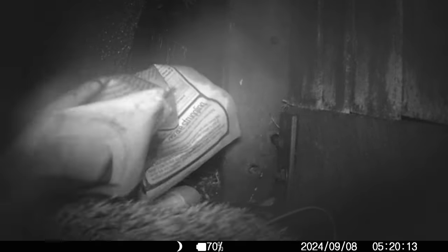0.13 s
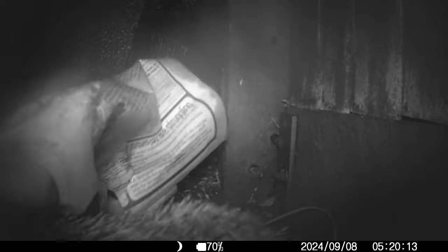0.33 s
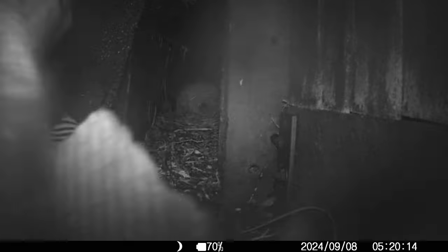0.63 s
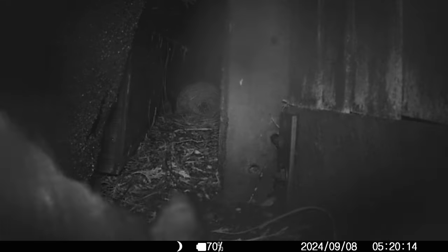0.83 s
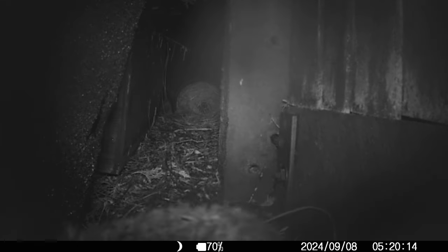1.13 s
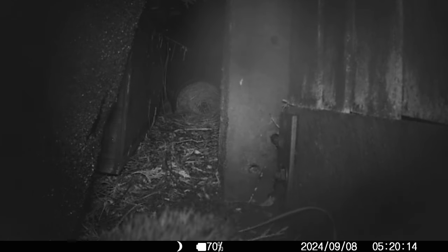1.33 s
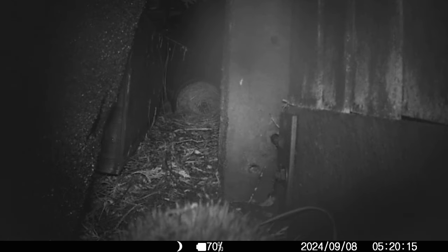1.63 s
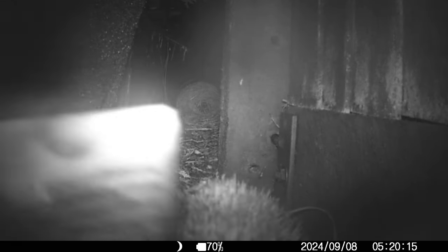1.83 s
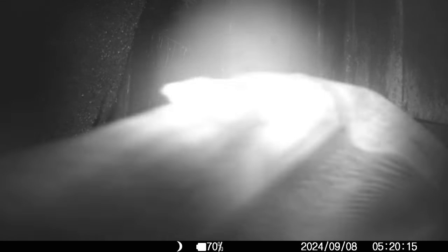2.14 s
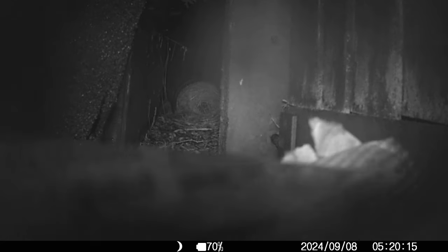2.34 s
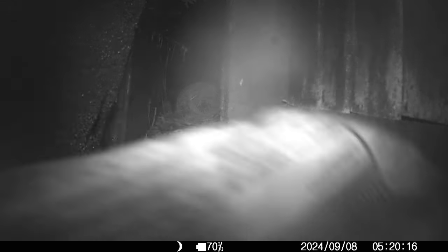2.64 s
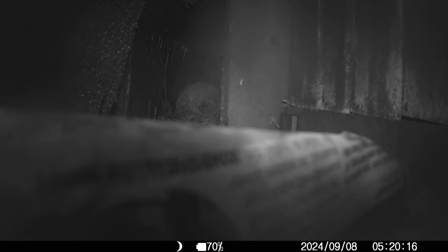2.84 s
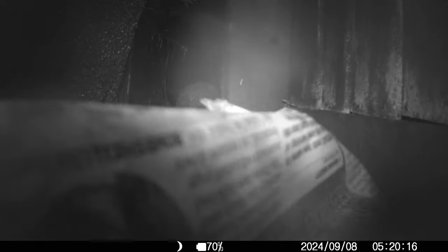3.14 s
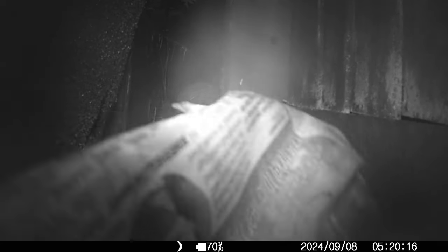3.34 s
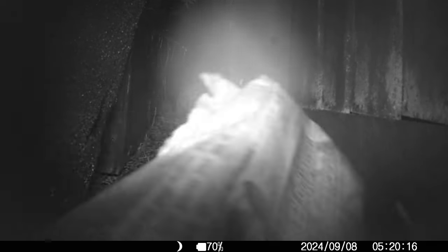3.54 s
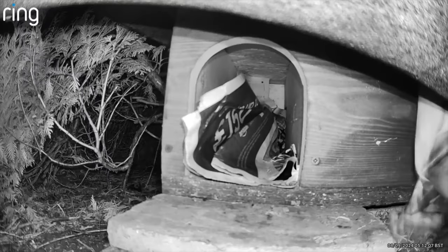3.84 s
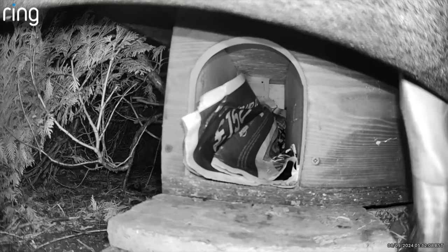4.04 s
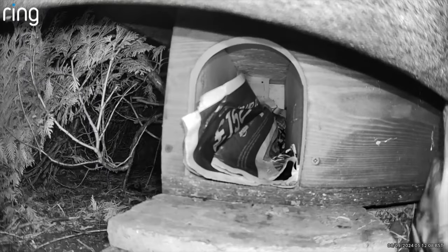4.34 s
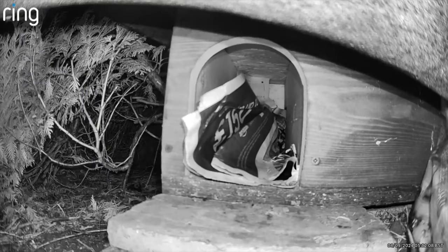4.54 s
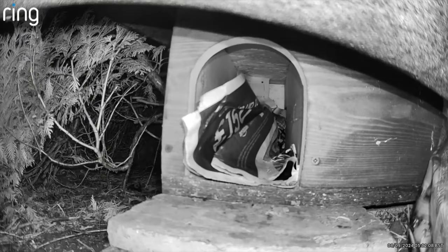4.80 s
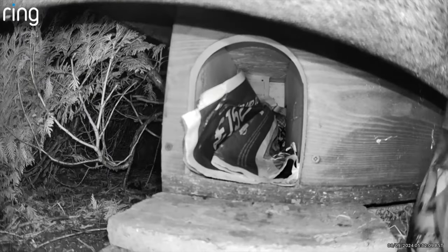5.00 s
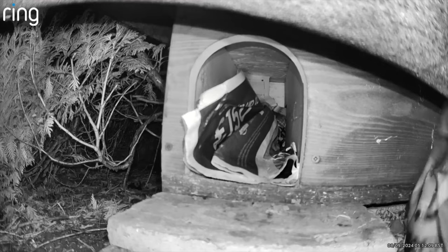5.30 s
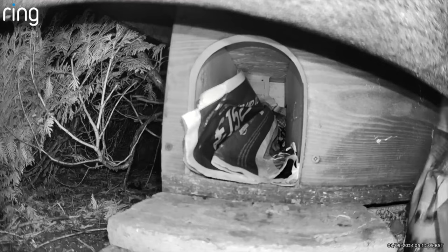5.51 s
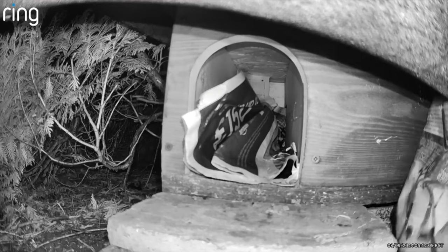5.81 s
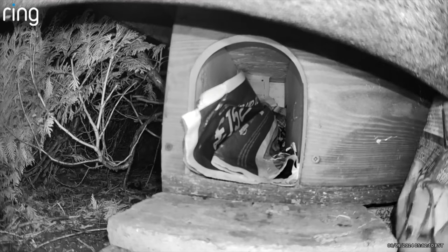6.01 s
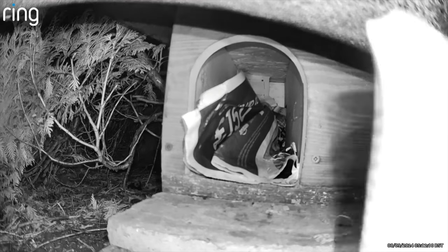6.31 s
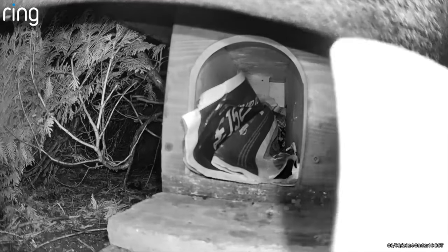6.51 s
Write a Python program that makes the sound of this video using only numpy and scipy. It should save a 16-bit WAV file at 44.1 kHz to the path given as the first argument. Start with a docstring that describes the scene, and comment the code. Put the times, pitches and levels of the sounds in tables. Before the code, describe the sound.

Dull papery crackling with soft thuds and plasticky scrapes up close, a brief cut, then crisp, swishing tugs of paper over wood.

```python
"""In a wooden shelter at night, a hedgehog drags a sheet of newspaper around.
First it is heard inside: shaped friction noise makes the paper, and damped modes ring the plastic
case of the microphone as spines scrape it and the body bumps it. After a very short gap it is heard
outside the entrance, brighter and smoother: denser slips, swelling in tugs, over a faint hiss.
Creases snap as band-limited clicks in both places."""
import sys
import numpy as np
from scipy import signal
from scipy.fft import rfft, irfft, next_fast_len
from scipy.io import wavfile
from scipy.ndimage import map_coordinates

SR = 44100
rng = np.random.default_rng(int(sys.argv[2]) if len(sys.argv) > 2 else 0)


def transcribe(signal):
    """Save signal, clipped to [-1, 1], as a 16-bit WAV file at the path in sys.argv[1]."""
    frames = np.atleast_2d(signal).T
    limited = np.clip(frames, -1, 1)
    pcm = np.round(limited * 32767).astype(np.int16)
    wavfile.write(sys.argv[1], SR, pcm)


N = 293696
TIME = np.arange(N) / SR  # s

MOVE_S = 3.618  # the listening point moves from inside to outside
INSIDE_TOP_HZ, TOP_HZ = 5000, 8900  # band limits of the inside and of the whole
STROKE_DROP_DB = 10  # fall of a stroke's level one rise before its peak and one fall after

# modes of the plastic case: (frequency [Hz], relative level [dB], t60 [s])
CASE_MODES = [(214, -11, 0.046), (271.3, -4, 0.086), (450, -13.5, 0.044), (629, -5.5, 0.041),
              (1060, -9.5, 0.049), (1321, 5, 0.029), (2175, 0, 0.014), (2450, -0.5, 0.028),
              (3000, -25, 0.057), (3400, -19, .03)]


def amp(db):
    """The level law: decibels to an amplitude ratio."""
    return 10 ** (np.asarray(db) / 20)


def unit(x):
    """Power normalisation: x scaled to rms 1."""
    return x / np.sqrt(np.mean(x ** 2) + 1e-20)


def along(points, hz):
    """Logarithmic pitch scale: (frequency [Hz], value) points interpolated over log frequency."""
    f, v = np.transpose(points)
    return np.interp(np.log(hz + 1), np.log(f + 1), v)


def filtered(x, response):
    """Linear filtering: the spectrum of x times a response of frequency."""
    size = next_fast_len(N + 8192)
    hz = np.fft.rfftfreq(size, 1 / SR)
    return irfft(rfft(x, size) * response(hz), size)[:N]


def coloured(x, spectrum):
    """Spectral shaping: x through a (frequency [Hz], gain [dB]) curve, at rms 1."""
    return unit(filtered(x, lambda hz: amp(along(spectrum, hz))))


def add(track, s, sound):
    """Superposition: a short sound is mixed in at time s."""
    part = track[round(s * SR):][:len(sound)]
    part += sound[:len(part)]


def paper_inside():
    """Stick-slip and bending: creases crinkle in shifting colours while the sheet flexes more dully."""
    # shoves: (fastest at [s], rise [s], fall [s], relative crinkle level [dB], relative flexing level [dB])
    shoves = [(.03, 0.12, .07, -46, -53), (.11, 0.043, 0.019, -51.5, -54), (.27, 0.048, 0.063, -64, -51.5),
              (.35, 0.074, 0.11, -49, -59), (.475, 0.086, .035, -46.5, -57), (.66, 0.12, 0.064, -45, -42.5),
              (.77, 0.097, 0.16, -41, -45.5), (.95, 0.036, 0.074, -43.5, -48),
              (1.19, 0.068, 0.073, -39, -48), (1.47, 0.063, 0.12, -40.5, -55),
              (1.595, 0.022, 0.011, -42.5, -44), (1.66, .04, 0.065, -52, -56),
              (1.82, 0.079, 0.094, -50, -67), (2.06, 0.088, 0.074, -36, -41.5),
              (2.16, 0.11, 0.042, -36, -36), (2.46, 0.052, 0.074, -44, -48),
              (2.61, 0.017, 0.071, -44.5, -50.5), (2.68, 0.07, 0.052, -40.5, -45.5),
              (2.81, 0.071, 0.054, -43, -45), (3.0, 0.065, 0.054, -49.5, -49), (3.14, 0.092, .1, -57, -56),
              (3.29, 0.076, 0.13, -38, -42), (3.38, 0.041, 0.042, -36, -35),
              (3.5, 0.081, 0.095, -39, -42.5)]
    # colour of the crinkling: (frequency [Hz], relative gain [dB])
    crinkle_colour = [(200, -38), (700, -8), (1500, 3), (2000, 1.5), (2750, 4), (3400, 2.5), (4250, 6.5),
                      (4700, 2), (4950, -4), (5300, -23.5)]
    # colour of the flexing sheet: (frequency [Hz], relative gain [dB])
    flex_colour = [(100, -31.5), (250, -1), (420, -0.5), (700, -2), (1300, -7), (2200, -10.5), (4000, -39)]

    crinkle, flex = strokes(shoves, roundness=1.42) + amp([[-71], [-72]])  # the sheet is never quite still
    fine = friction(rate=700, spread_db=5.5, smooth_db=-1, clump_db=1.5, clump_rate=110)
    fine = shifting(fine, depth_db=2.2, width_hz=900, rate=150, size=128)
    fine = shifting(fine, depth_db=1.5, width_hz=277.6, rate=18, size=512)
    coarse = friction(rate=500, spread_db=4, smooth_db=-2, clump_db=3, clump_rate=80)
    coarse = shifting(coarse, depth_db=2.6, width_hz=170, rate=30, size=512)
    ticks = amp(-6.5) * crackle(rate=60, centre_hz=2800)

    crinkling = crinkle * (coloured(fine, crinkle_colour) + ticks)
    flexing = amp(1.5) * flex * coloured(coarse, flex_colour)
    return crinkling + flexing


def paper_outside():
    """Sliding friction: each tug draws the sheet over wood in dense slips, above the rustle of its folds."""
    # tugs: (fastest at [s], rise [s], fall [s], relative sliding level [dB], relative flexing level [dB])
    tugs = [(3.66, 0.07, 0.033, -52.5, -62.5), (3.83, 0.071, 0.086, -28, -38),
            (3.98, 0.064, 0.13, -26, -36), (4.13, 0.073, 0.049, -23, -31.5),
            (4.215, 0.037, 0.059, -20.5, -31), (4.4, 0.089, 0.064, -28.5, -35),
            (4.575, 0.17, .046, -25.5, -34), (4.695, .04, 0.031, -48, -60), (4.78, 0.04, 0.044, -53, -59.5),
            (4.96, 0.026, .04, -35.5, -44.5), (5.04, .052, 0.089, -23, -30), (5.23, 0.059, .1, -40, -43),
            (5.36, 0.05, .08, -29, -33.5), (5.46, .07, 0.043, -25.5, -29.5), (5.66, 0.11, .06, -35, -46.5),
            (5.765, 0.1, 0.089, -22.5, -27.5), (5.88, 0.032, .028, -30.5, -34.5),
            (5.96, 0.052, 0.066, -55.5, -64), (6.265, 0.034, 0.14, -23.5, -31.5),
            (6.38, 0.067, 0.099, -27, -34), (6.63, 0.19, 0.2, -29.5, -35.5)]
    # colour of the sliding: (frequency [Hz], relative gain [dB])
    slide_colour = [(500, -41.5), (1300, -14.5), (1680, -0.5), (2050, -1.5), (2600, -0.5), (3130, 2.5),
                    (3650, -0.5), (4300, 1.5), (5250, -1), (6000, -4.5), (6850, -10), (7400, -18),
                    (8000, -26), (8750, -41)]
    # colour of the hollow, flexing sheet: (frequency [Hz], relative gain [dB])
    sheet_colour = [(25, -22.5), (70, -13.5), (140, -3.5), (250, 0.5), (560, 0.5), (850, -3), (1200, -11.5),
                    (2000, -10.5), (5000, -51)]
    # the sheet's edge catching more or less: (time [s], lift of the fizz [dB])
    edge_lift = [(3.63, -3), (3.95, -1.5), (4.2, 3), (4.5, -0.9), (5.05, -2), (5.2, -1), (5.42, 0),
                 (5.75, 0.5), (6.3, -0.2), (6.66, -4)]

    slide, flex = strokes(tugs, roundness=1.61) + amp([[-76], [-88]])
    fine = friction(rate=2600, spread_db=4, smooth_db=0, clump_db=1.2, clump_rate=140)
    fine = shifting(fine, depth_db=1.78, width_hz=350, rate=30, size=512)
    fine = coloured(fine, slide_colour)
    fizz = filtered(fine, lambda hz: 1 - 1 / (1 + (hz / 5200) ** 8))  # what lies above about 5200 Hz
    edge_s, edge_db = np.transpose(edge_lift)
    edge = amp(np.interp(TIME, edge_s, edge_db))
    coarse = friction(rate=900, spread_db=8.5, smooth_db=5, clump_db=2.5, clump_rate=76)
    ticks = amp(-14) * coloured(crackle(rate=83, centre_hz=3600), slide_colour)

    sliding = amp(-1) * slide * (fine + (edge - 1) * fizz + ticks)
    flexing = amp(0.5) * flex * coloured(coarse, sheet_colour)
    return sliding + flexing


def friction(rate, spread_db, smooth_db, clump_db, clump_rate):
    """Stick-slip: tiny slips of uneven size, rate per second, over a smooth rub, in quick clumps."""
    count = 60000
    sign = rng.choice([-1, 1], count)
    size = sign * amp(spread_db * np.clip(rng.standard_normal(count), -3, 2))
    where = rng.integers(0, N, count)
    used = np.arange(count) < rate * N / SR
    slips = unit(np.bincount(where, size * used, N))
    rub = amp(smooth_db) * rng.standard_normal(N)
    clumps = map_coordinates(rng.standard_normal(4096), [TIME * clump_rate], mode="mirror")
    return unit((slips + rub) * amp(clump_db * np.clip(clumps, -2, 2)))


def shifting(x, depth_db, width_hz, rate, size=256):
    """Time-varying resonance: paper keeps changing shape, so broad bands of its sound rise and sink."""
    hz, t, z = signal.stft(x, SR, nperseg=size)
    place = np.meshgrid(hz / width_hz, t * rate, indexing="ij")
    field = map_coordinates(rng.standard_normal((128, 2048)), place, order=1, mode="mirror")
    shifted = signal.istft(z * amp(depth_db * unit(field)), SR, nperseg=size)[1]
    return unit(shifted[:N])


def crackle(rate, centre_hz, spread_db=4.0, spread_octaves=0.87, cycles=1.2):
    """Random buckling: lesser creases give way, each a damped tick at its own pitch; rms 1."""
    count, order = 1500, 128  # ticks available, samples in each
    sign, size, pitch = rng.standard_normal((count, 3)).T
    start = rng.integers(0, N - order, count)
    hz = centre_hz * 2 ** (spread_octaves * pitch[:, None])
    turns = hz * np.arange(order) / SR
    used = np.arange(count) < rate * N / SR
    level = np.sign(sign) * amp(spread_db * np.clip(size, -2, 1.5)) * used
    ticks = level[:, None] * np.sin(2 * np.pi * turns) * np.exp(-turns / cycles)
    where = start[:, None] + np.arange(order)
    return unit(np.bincount(where.ravel(), ticks.ravel(), N))


def stroke(s, rise, fall, roundness):
    """Speed sets level: a movement quickens until s, then slows (roundness 1 = a point, 2 = a bell)."""
    away = np.maximum((s - TIME) / rise, (TIME - s) / fall)
    return amp(-STROKE_DROP_DB * np.minimum(away, 12) ** roundness)


def strokes(rows, roundness):
    """Incoherent addition: gains of the two layers each movement drives, overlaps summed in power."""
    power = 0
    for s, rise, fall, *levels_db in rows:
        power = power + np.outer(amp(levels_db), stroke(s, rise, fall, roundness)) ** 2
    return np.sqrt(power)


def snaps(flutter_db=-17, band_ratio=1.93):
    """Buckling instability: a crease snaps with one sharp click and the sheet flutters briefly after it."""
    # creases snapping: (time [s], peak of the click [dB], band centre [Hz])
    creases = [(0.103, -26, 3600), (.547, -26.5, 3500), (.6305, -24, 1400), (0.637, -21.5, 3900),
               (.669, -21, 4000), (.784, -18.5, 2200), (0.81, -18.5, 2200), (.9325, -22.5, 3800),
               (0.961, -20, 3600), (1.1521, -16, 3400), (1.161, -17, 3400), (1.6018, -23.5, 3500),
               (1.7447, -28, 3000), (2.0167, -12, 3830), (2.0774, -18, 3600), (2.1233, -18, 1980),
               (2.2629, -31, 1130), (2.289, -28, 2040), (2.872, -11, 1500), (2.911, -27, 1020),
               (3.465, -23.5, 990), (3.5052, -18.5, 3800), (3.522, -16.5, 2400), (3.5668, -16, 2670),
               (4.1557, -13, 3800), (4.2574, -7, 4200), (4.7688, -25, 4150), (4.9818, -13.5, 2960),
               (5.1542, -17.5, 3000), (5.4129, -4.5, 3600), (5.5474, -12, 4350), (6.098, -44.5, 2500)]
    out, t = np.zeros(N), np.arange(SR // 12) / SR
    for s, db, hz in creases:
        # a harder snap frees the crease more cleanly: the flutter's t60, 0.02 s at -22 dB, halves every 18.5 dB
        t60 = 0.02 * 2 ** ((-22 - db) / 18.5)
        top_hz = 4700 if s < MOVE_S else 6700
        band = np.vstack([
            signal.butter(2, [hz / band_ratio, hz * band_ratio], "bandpass", fs=SR, output="sos"),
            signal.butter(8, top_hz, fs=SR, output="sos")])
        click = signal.sosfilt(band, t == 0)
        decay = amp(flutter_db - 60 * t / t60) * (t > 1 / hz)  # starts one cycle after the click
        flutter = signal.sosfilt(band, decay * rng.standard_normal(len(t)))
        add(out, s, amp(db) * (click + flutter) / np.abs(click).max())
    return out


def scrapes(spread_db=5):
    """Driven resonance: as a taut fold rubs along an edge, rough slips excite its one resonance."""
    # (middle [s], length at half height [s], rms [dB], resonance [Hz], half-width at -6 dB [Hz])
    rubs = [(0.63, 0.0077, -38.5, 1000, 450), (.785, 0.0078, -29.5, 1390, 400),
            (0.817, 0.0074, -32.5, 1400, 550), (2.083, 0.047, -40, 4170, 354),
            (2.127, 0.01, -29, 1680, 200), (2.61, 0.021, -40.5, 4260, 400), (2.7, 0.011, -34, 1060, 415),
            (2.799, .02, -36, 607, 109), (3.368, 0.033, -32, 4200, 496), (3.479, 0.01475, -28, 415, 250),
            (3.509, 0.0075, -28.5, 4250, 500), (6.258, 0.027, -28, 1980, 450),
            (6.299, 0.1, -38.5, 1060, 345), (6.353, 0.029, -26, 573, 130)]
    out, t = np.zeros(N), np.arange(SR // 4) / SR
    hz = np.fft.rfftfreq(len(t), 1 / SR)
    for s, length, db, centre, width in rubs:
        slips = rng.standard_normal(len(t)) * amp(spread_db * rng.standard_normal(len(t)))
        ring = irfft(rfft(slips) / (1 + 1j * (hz - centre) / width) ** 2, len(t))
        swell = np.sin(np.pi * np.clip(t / (2 * length), 0, 1)) ** 2
        add(out, s - length, amp(db) * unit(ring * swell) * np.sqrt(np.mean(swell ** 2)))
    return out


def pushing():
    """Friction-driven modes: spines scrape the case into ringing; the body rocks it and shuffles."""
    # pushes past the case: (hardest at [s], rise [s], fall [s], relative scraping [dB], relative shuffling [dB])
    pushes = [(.265, 0.049, 0.11, -43.5, -49), (.44, 0.23, 0.11, -45.5, -63),
              (.605, 0.048, 0.1, -30.5, -47), (.79, 0.19, 0.037, -33, -43),
              (.96, 0.061, 0.043, -32.5, -38.5), (1.16, 0.029, .1, -34, -37.5),
              (1.47, 0.15, 0.049, -42.5, -63), (1.59, 0.09, 0.061, -46, -40.5),
              (1.7, 0.096, .05, -46.5, -43), (1.83, 0.022, 0.038, -38.5, -49),
              (2.03, 0.12, 0.1, -31.5, -40.5), (2.18, 0.069, 0.018, -34.5, -37),
              (2.49, 0.06, 0.12, -41.5, -43), (2.69, 0.079, .11, -57, -36.5),
              (2.9, 0.089, 0.15, -52.5, -44), (3.33, 0.063, 0.086, -38, -28.5),
              (3.52, 0.053, 0.27, -40, -33.5)]
    # colour of the rocking: (frequency [Hz], relative gain [dB])
    rock_colour = [(8, -17), (20, -15), (28, 11), (42, -15), (65, -0.5), (100, -40), (200, -73)]
    # colour of the shuffling on the floor: (frequency [Hz], relative gain [dB])
    shuffle_colour = [(35, -10.5), (65, 3), (120, -2), (190, -0.5), (320, -7), (520, -13), (1000, -45)]
    ring_colour = [(100, 3.5), (300, 5.5), (650, -9.5), (1300, -12.5), (2400, -19.5), (4000, -30)]  # (Hz, dB)

    scrape, shuffle = strokes(pushes, roundness=1.16)
    shuffle = shuffle + amp(-60)  # the feet are never quite still
    rock = rocking() + amp(-59.5)
    spines = friction(rate=450, spread_db=4.5, smooth_db=-6.5, clump_db=4.5, clump_rate=55)
    ring = coloured(filtered(spines, case_ring), ring_colour)
    sway = coloured(rng.standard_normal(N), rock_colour)
    steps = coloured(rng.standard_normal(N), shuffle_colour)
    return scrape * ring + amp(-2.5) * rock * sway + amp(-3) * shuffle * steps


def rocking():
    """Damped sway: each lurch of the animal's weight sets the case rocking, and the gain dies away."""
    # lurches: (time [s], relative level [dB])
    lurches = [(0.631, -32), (.98, -27), (1.28, -34), (1.7, -34.5), (2.05, -29), (2.2, -36), (2.74, -30.5),
               (3.57, -35)]
    power = 0
    for s, db in lurches:
        power = power + (amp(db) * stroke(s, rise=0.066, fall=0.17, roundness=1.15)) ** 2
    return np.sqrt(power)


def case_ring(hz):
    """Modal superposition: the case responds as a sum of resonances, each as wide as its decay is fast."""
    total = 0
    for centre, db, t60 in CASE_MODES:
        width = np.log(1000) / np.pi / t60
        total = total + amp(db) * 1j * hz * width / (centre ** 2 - hz ** 2 + 1j * hz * width)
    return total


def knocks(scatter_db=1, detune=0.022):
    """Modal excitation: spines and feet knock the case, and where they land sets each mode's share."""
    # (time [s], relative low modes [dB], relative middle modes [dB], relative top modes [dB])
    blows = [(0.586, -12.5, -44, -42), (.602, -13, -48, -39), (.632, -32, -31, -41),
             (.65, -27, -29.5, -18.5), (0.682, -11, -20, -29.5), (.958, -4.5, -22, -23),
             (1.044, -26, -20.5, -20.5), (1.1507, -19.5, -29.5, -20.5), (1.177, -10.5, -20, -9),
             (1.186, -31.5, -18.5, -17.5), (1.463, -25, -26, -34), (1.672, -17.5, -29.5, -30.5),
             (1.855, -21, -39, -31.5), (1.985, -22, -19.5, -45), (2.017, -12, -14.5, -22),
             (2.095, -23, -20, -17)]
    out, t = np.zeros(N), np.arange(SR // 6) / SR
    hz, mode_db, t60 = np.transpose(CASE_MODES)[:, :, None]
    for s, low_db, middle_db, top_db in blows:
        # a soft knock swells slowly: 2.1 ms, doubled per 14 dB by which low modes outweigh top ones
        rise = 0.0021 * 2 ** ((low_db - top_db) / 14)
        share_db = along([(400, low_db), (1300, middle_db), (2200, top_db)], hz)
        scatter = scatter_db * rng.standard_normal(hz.shape)
        level = amp(mode_db + share_db + scatter - 60 * t / t60)
        pitch = hz * (1 + detune * rng.standard_normal(hz.shape))
        phase = 2 * np.pi * (pitch * t + rng.random(hz.shape))
        swell = 1 - np.exp(-(t / rise) ** 2)
        add(out, s, np.sum(level * np.sin(phase), axis=0) * swell)
    return out


def bumps():
    """Damped oscillation: a soft bump of the body is a low sinusoid that dies exponentially."""
    # (time [s], level at the start of the decay [dB], pitch [Hz], t60 [s])
    thuds = [(0.613, -23.5, 52.7, 0.19), (0.647, -25, 30, .15), (0.976, -31.5, 27.66, 0.58),
             (1.052, -23.5, 172, 0.058), (1.154, -20, 66, 0.059), (1.177, -18.5, 201.5, 0.073),
             (2.122, -7.5, 123, 0.034), (2.261, -8, 211, 0.0033), (3.465, -17, 220, 0.014),
             (3.4738, -19, 164, .025)]
    out, t = np.zeros(N), np.arange(SR // 3) / SR
    for s, db, hz, t60 in thuds:
        add(out, s, -amp(db - 60 * t / t60) * np.sin(2 * np.pi * hz * t))
    return out


def walls(x, wet_db):
    """Reverberation: the close wooden walls add a short answer, noise decaying at its own rate per pitch."""
    # decay of the shelter: (frequency [Hz], t60 [s])
    shelter = [(200, 0.21), (2000, 0.042), (8000, 0.062)]
    hz, t, z = signal.stft(rng.standard_normal(SR // 4), SR, nperseg=256)
    decay = amp(-60 * t / along(shelter, hz)[:, None])
    tail = signal.istft(z * decay, SR, nperseg=256)[1]
    answer = np.pad(tail, (90, 0)) / np.linalg.norm(tail)  # 90 samples (2 ms) late
    return x + amp(wet_db) * signal.fftconvolve(x, answer)[:N]


def housing(x):
    """Resonant coloration: the entrance microphone's housing lifts or dips narrow bands."""
    # (centre [Hz], full width at half the lift [Hz], lift [dB])
    bands = [(1706, 200, 3.5), (3100, 48, -1.5), (3920, 11, 4.5), (4820, 19, -3.5)]

    def response(hz):
        return amp(sum(db / (1 + (2 * (hz - centre) / width) ** 2) for centre, width, db in bands))

    return filtered(x, response)


def hiss():
    """Stationary noise: a faint, steady, coloured hiss outside."""
    # (frequency [Hz], relative gain [dB])
    hiss_colour = [(20, 0), (150, 8.5), (600, -18), (2000, -8.5), (6000, -12.5), (8500, -15)]
    return amp(-88) * coloured(rng.standard_normal(N), hiss_colour)


def scene():
    """Superposition at two places: the dull microphone inside, then the brighter one at the entrance."""
    creases = snaps() + scrapes()
    inside = walls(paper_inside() + creases, wet_db=-22.5) + pushing() + knocks() + bumps()
    inside = filtered(inside, lambda hz: 1 / np.sqrt(1 + (hz / INSIDE_TOP_HZ) ** 60))
    outside = housing(walls(paper_outside() + creases, wet_db=-16) + hiss())
    # 3 ms fades on either side of a 12 ms silence
    handover = (TIME - MOVE_S) / 0.003
    fade_out, fade_in = np.clip(-handover - 2, 0, 1), np.clip(handover - 2, 0, 1)
    return (inside * fade_out + outside * fade_in)[None]


def record(dry):
    """Band limiting: nothing is kept from TOP_HZ up."""
    return filtered(dry[0], lambda hz: hz < TOP_HZ)[None]


dry = scene()
out = record(dry)
transcribe(out)
```